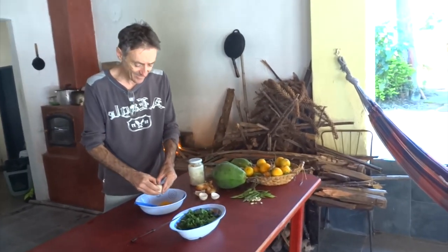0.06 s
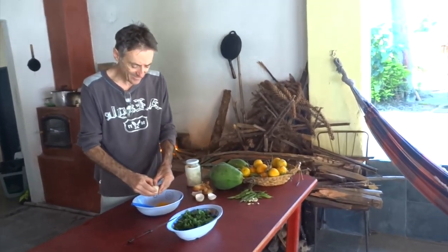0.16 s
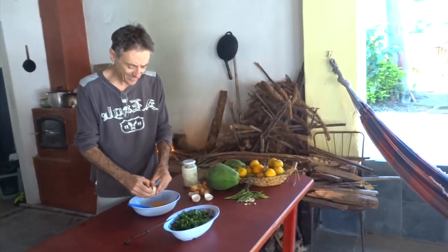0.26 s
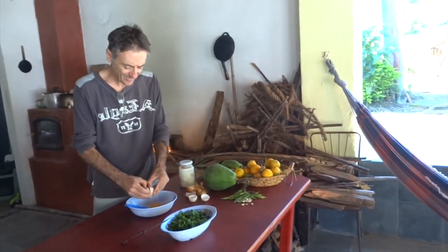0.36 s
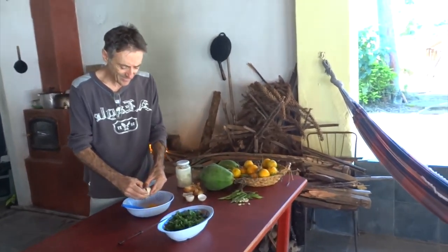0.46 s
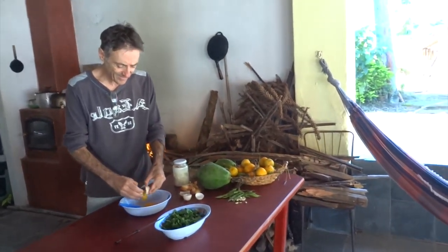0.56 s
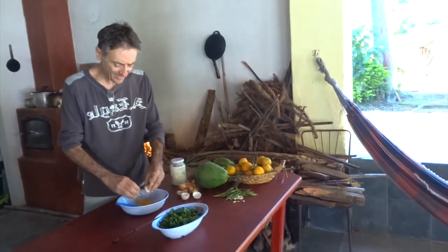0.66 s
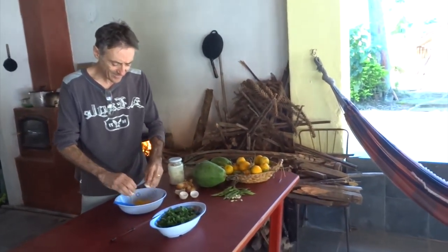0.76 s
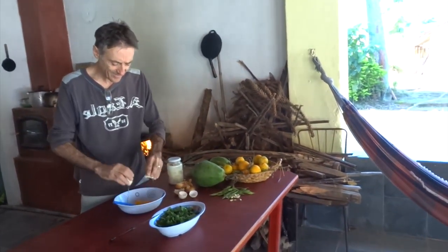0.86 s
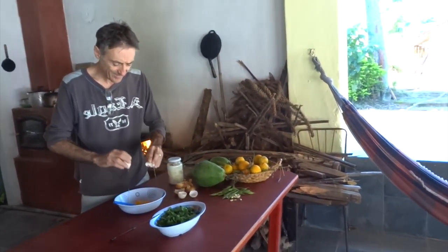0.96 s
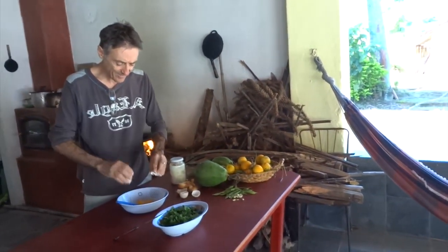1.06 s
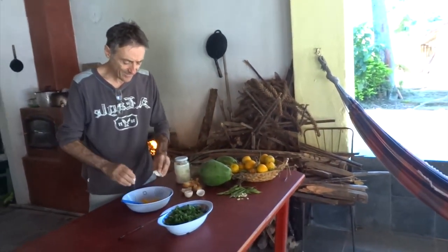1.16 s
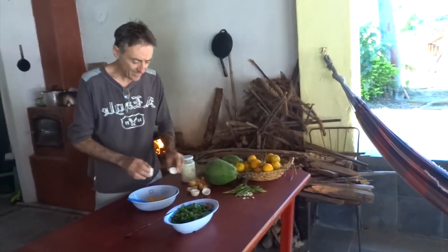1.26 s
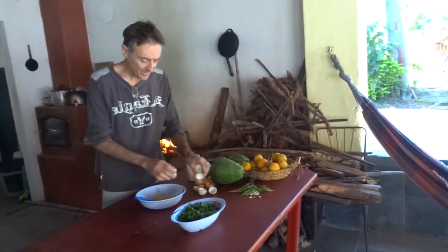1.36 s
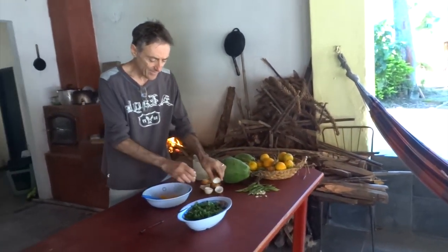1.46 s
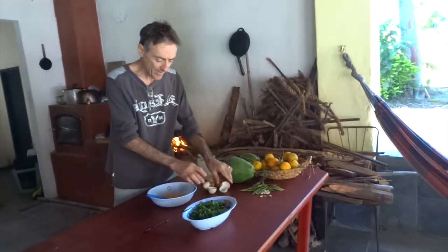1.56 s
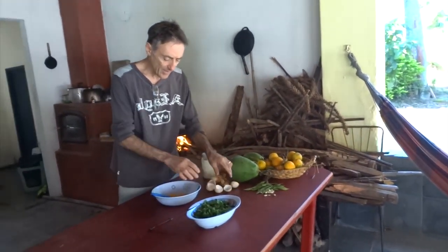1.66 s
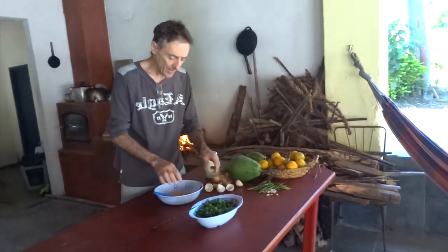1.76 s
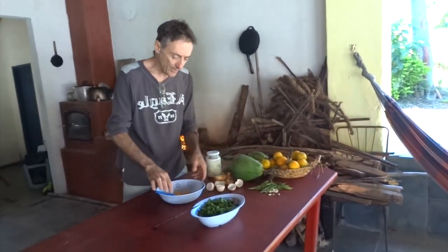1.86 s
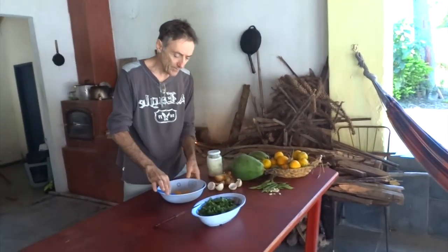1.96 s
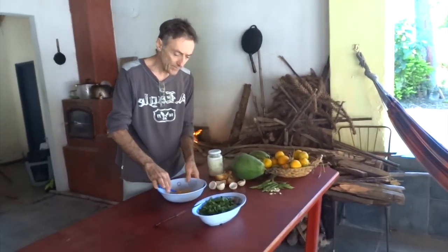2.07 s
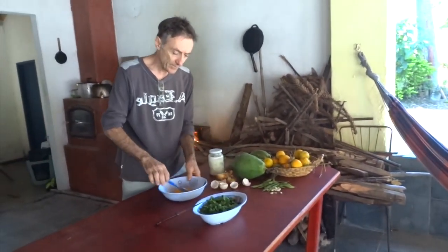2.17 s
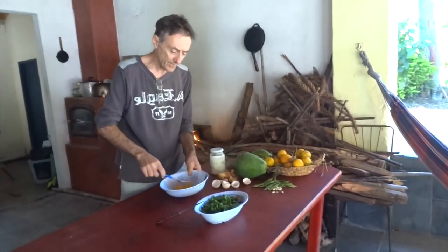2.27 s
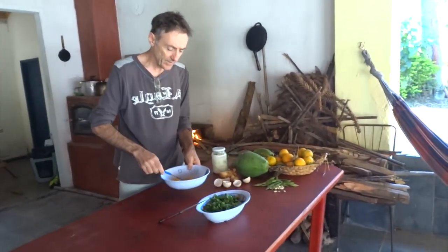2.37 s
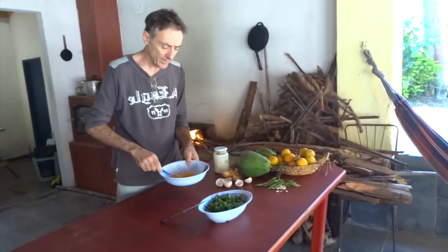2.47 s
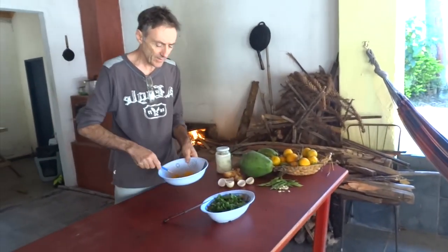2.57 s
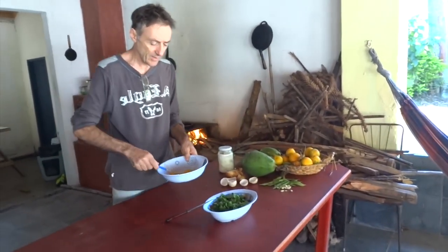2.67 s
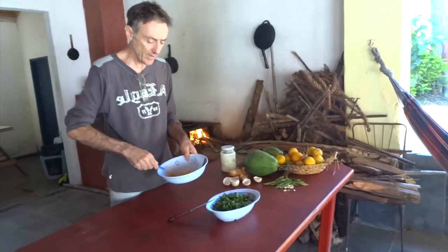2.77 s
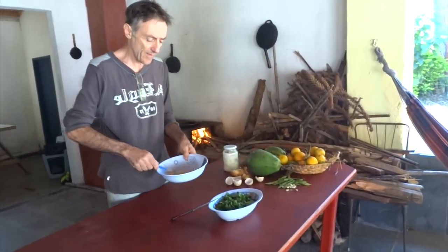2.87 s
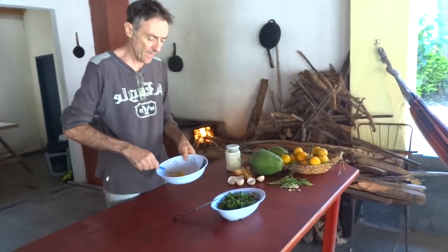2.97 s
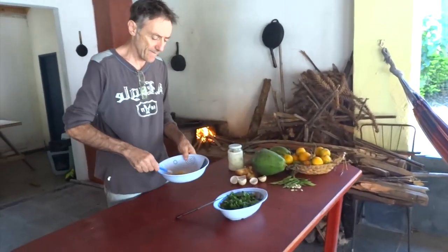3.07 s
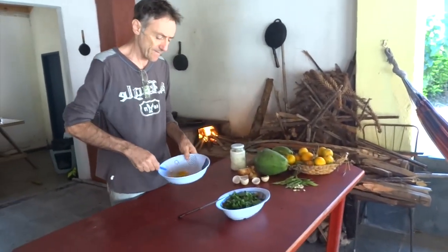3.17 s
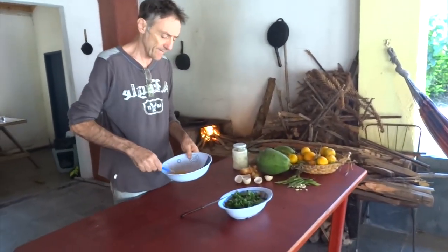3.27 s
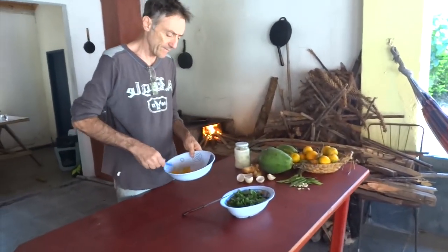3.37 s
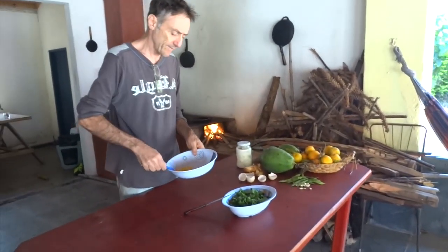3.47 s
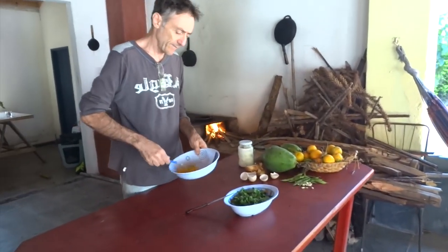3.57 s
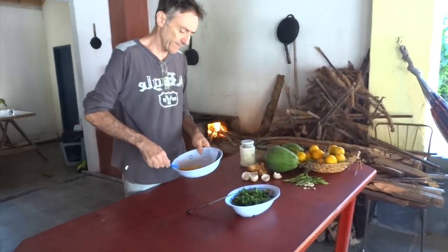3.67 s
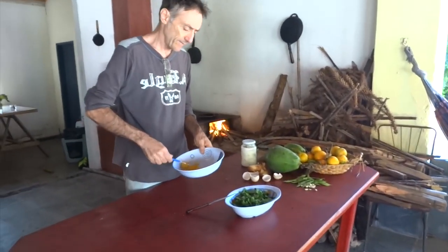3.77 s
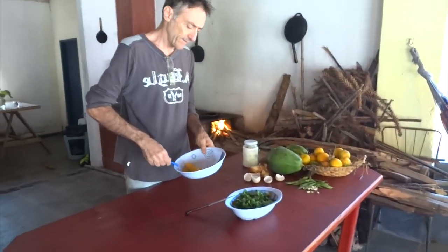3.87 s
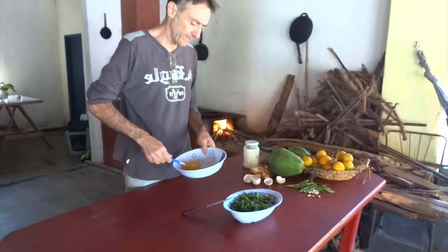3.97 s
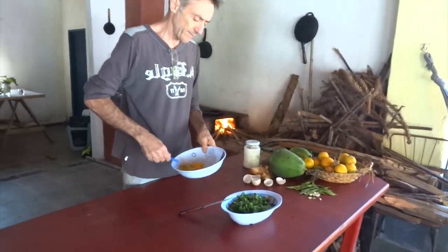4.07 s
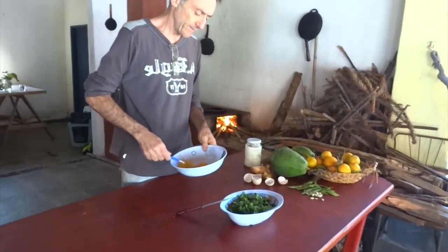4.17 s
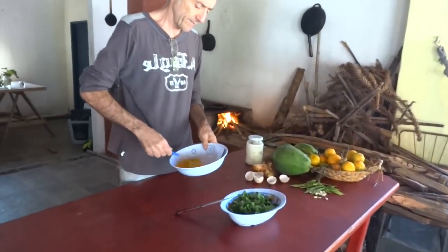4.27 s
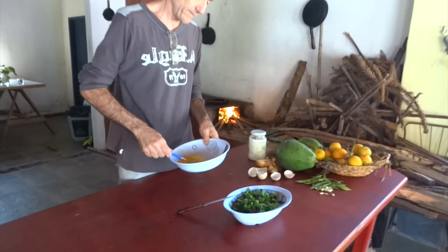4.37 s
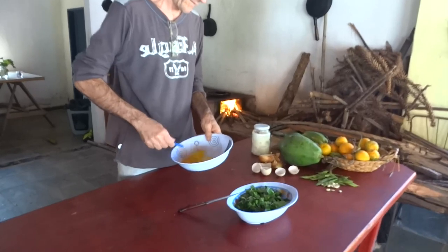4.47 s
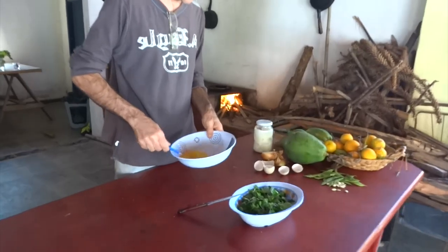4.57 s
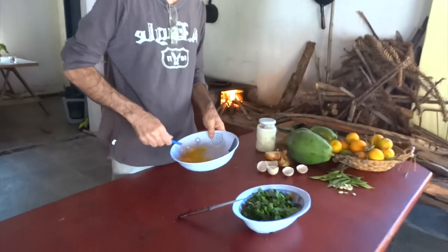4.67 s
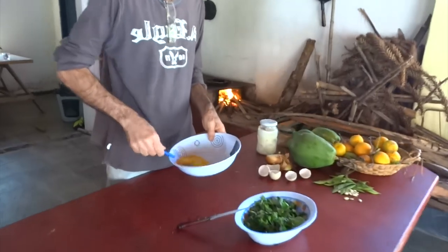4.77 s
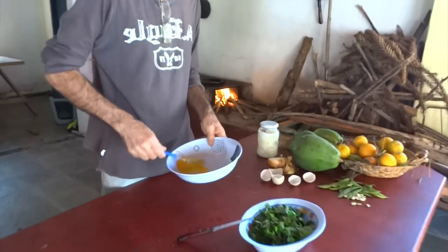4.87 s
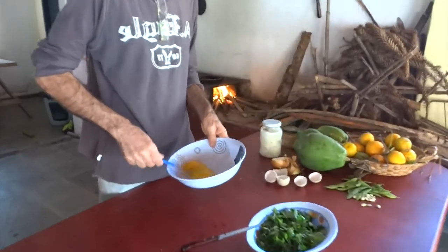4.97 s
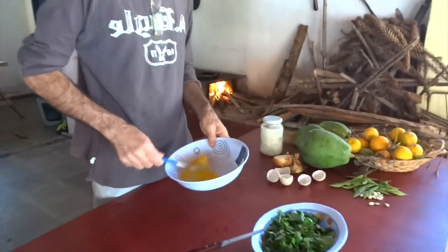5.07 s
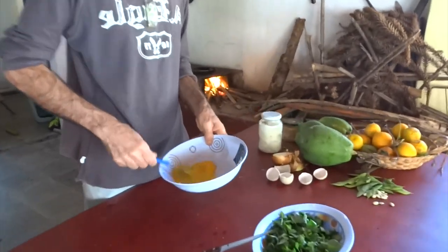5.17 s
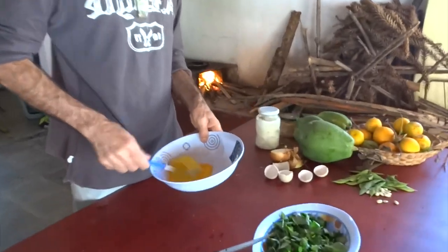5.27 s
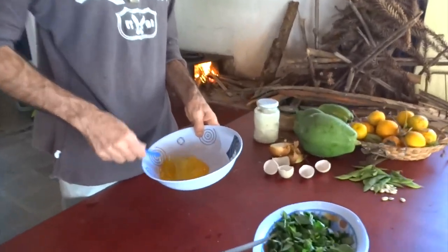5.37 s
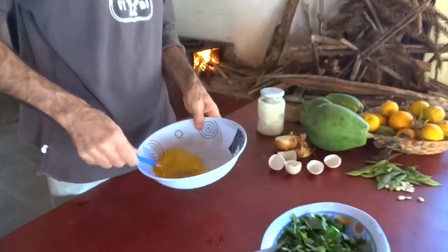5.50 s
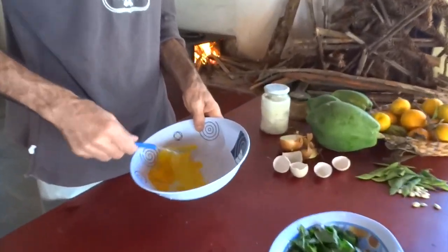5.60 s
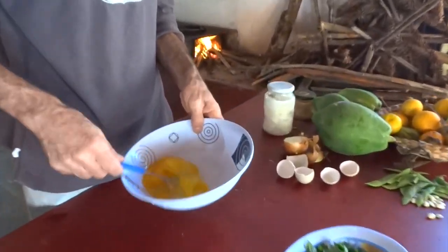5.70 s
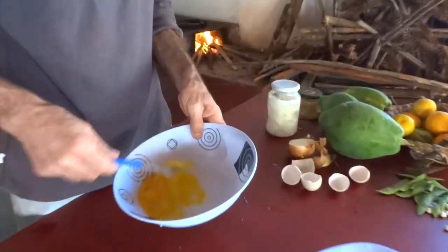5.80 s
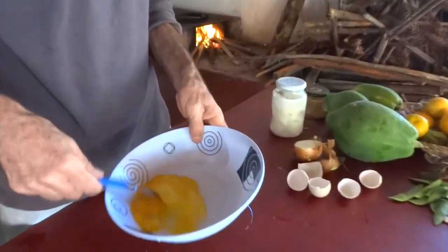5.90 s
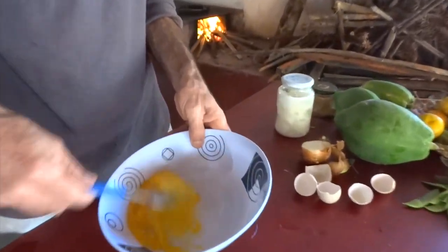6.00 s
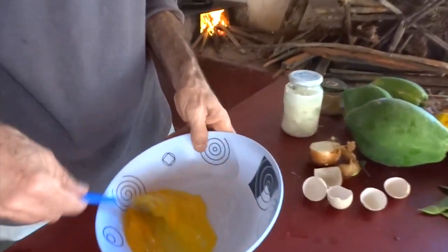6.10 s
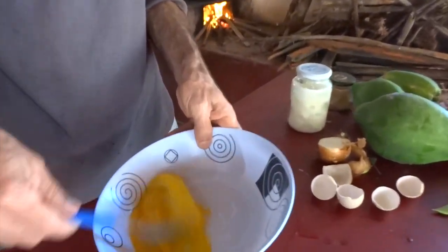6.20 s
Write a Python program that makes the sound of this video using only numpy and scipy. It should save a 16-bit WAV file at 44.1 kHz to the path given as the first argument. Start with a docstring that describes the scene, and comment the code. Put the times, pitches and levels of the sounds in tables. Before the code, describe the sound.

In an open kitchen with hard walls, light cracks of eggshell and a hollow knock on the table come first. Then a fork strikes a bowl in a quick, even rhythm, each click ringing briefly over the wet swish of egg. Small birds whistle faintly outdoors. The microphone comes nearer toward the end, the echo lessens, and lifted egg drops back with a smack.

```python
"""Eggs are opened and then beaten in a bowl, in an open kitchen with hard, echoing walls. First hands rub and
snap the shells, tap eggs on the bowl and put things down with hollow knocks; small birds whistle outside. At
about 2.6 s the bowl is picked up, and a fork starts to strike it five times a second. Fork and bowl ring, the
egg slops, and air pockets plop shut. Near the end the microphone moves closer, so there is less echo, and
lifted egg falls back with a smack. A limiter turns down the loudest clicks."""
import sys
import numpy as np
from scipy import signal
from scipy.fft import rfft, irfft
from scipy.io import wavfile
from scipy.ndimage import uniform_filter1d, minimum_filter1d

SR = 44100
rng = np.random.default_rng(int(sys.argv[2]) if len(sys.argv) > 2 else 0)


def pcm_store(signal):
    """Save signal as 16-bit PCM."""
    levels = np.round(np.clip(np.atleast_2d(signal), -1, 1) * 32767)
    wavfile.write(sys.argv[1], SR, levels.astype(np.int16).T)


N = 275184
TIME = np.arange(N) / SR

# Tone colours, or how strong each pitch is in a noise: (frequency [Hz], relative level [dB])
AIR_TONE = [(15, -74), (25, -36), (309, -9.5), (624, -2), (1290, -7.5), (2610, -18), (4250, -9.5),
            (4740, -4), (5880, -3), (6380, -40.5), (7310, 6), (8830, 0), (11900, -17.5), (14000, -14),
            (16000, -47)]  # outdoor hush and insects
RUB_TONE = [(59, -50), (100, -26), (265, -13.5), (673, -17.5), (814, -2), (1270, -12), (2200, -1.5),
            (4250, -8), (7220, 2), (9910, -9.5), (13900, -42), (15800, -76)]  # rubbing and sliding
SNAP_TONE = [(200, -42), (1500, -42), (2800, -13.5), (4500, -6.5), (7000, 9), (8700, 8), (11000, -6),
             (15800, -22)]  # breaking eggshell
THUD_TONE = [(60, -22), (180, -11), (400, -1.5), (900, 6.5), (1500, 14), (3000, -11), (8000, -33)]  # the table top
SLOP_TONE = [(30, -70), (200, -66), (380, -24), (600, -21.5), (1200, -4), (2500, 5.5), (4500, 3.5),
             (7500, 11), (10000, -1), (11500, -6), (15800, -17)]  # stirred egg
SMACK_TONE = [(300, -48), (2800, -28), (7000, 2.5), (9500, 1.5), (11500, -6), (15800, -23)]  # falling egg
CRACK_TONE = [(100, -42), (400, -40), (1000, -25.5), (2000, -1.5), (3200, 2), (4300, 3.5), (5100, 3.5),
              (6100, 2), (7500, 6), (9900, -0.5), (11200, -12), (15800, -46.5)]  # the fork on the bowl's wall

# Notes that struck things ring with; wider ones die sooner: (pitch [Hz], width [Hz], relative level [dB])
HOLLOW_NOTES = [(870, 45, -20.5), (2270, 310, 0), (2666, 170, 0), (2870, 327, 4), (3450, 340, 0.5),
                (3980, 150, -6), (4650, 1500, -6.5)]  # eggs tapped on the bowl and things put down
FOOT_NOTES = [(470, 47, -8), (700, 34, -17), (788, 30, -10), (1564, 36, 5.5), (1690, 33, 5), (2070, 110, 2)]  # the bowl's foot on the table
GLUG_NOTES = [(568, 39, -4.5), (688.5, 25, -2.5), (867, 42, 0), (1001, 48, 2.5)]  # the hollow under the egg
BOWL_NOTES = [(1158, 190, -10.5), (1308, 94, -4), (1700, 144, 4), (2030, 106, 4.5), (2264, 390, -7.5)]  # the bowl's body
RIM_NOTES = [(2765, 55, -9), (2840, 160, 2.5), (3845, 73, -6), (4440, 130, -13), (4860, 130, -16),
             (4960, 300, 0.5), (6177, 69, 0), (8294, 83, 2.5), (10100, 170, -8)]  # its stiff rim, woken by hard strokes
NECK_NOTES = [(3146, 62, -1.5), (3230, 333, 9.5), (3660, 320, -14)]  # the fork's neck
PRONG_NOTES = [(5926, 120, -6), (7040, 152, 3), (7366, 180, 2.5), (8910, 460, -7.5), (10010, 440, -7.5),
               (11380, 490, -20), (13300, 680, -18), (16400, 1400, -17.5)]  # its prongs

# How long the kitchen echoes: (frequency [Hz], base time to fade by 60 dB [s])
ECHO_TIMES = [(200, 0.23), (600, 0.94), (1200, 0.53), (2800, 0.52), (7300, 0.46), (11000, 0.4),
              (16000, 0.46)]
# How much echo and hush spread to left and right: (frequency [Hz], gain [dB])
STEREO_WIDTH = [(50, 1), (150, -8), (400, -15), (1200, -16), (2500, -16.5), (4500, -26), (7000, -49),
                (9000, -14.5), (12000, -8), (16000, -65)]
# The microphone's path, which sets the amount of echo: (time [s], distance from the bowl [m])
DISTANCE = [(0, 1.6), (3.6, 1.26), (4.4, 1.17), (5.2, 1.38), (5.65, 0.71), (6.24, 0.99)]
# One bird's falling chirps: (time [s], length [s], starting pitch [Hz], level [dB])
CHIRPS = [(1.322, 0.096, 7730, -48), (2.351, 0.088, 9100, -39.5), (2.378, 0.18, 8650, -41.5),
          (4.037, 0.05, 8900, -32.5), (5.099, .065, 9100, -30.5), (6.05, 0.083, 8900, -33.5),
          (6.21, 0.11, 9580, -28)]
# Other birds' held whistles: (time [s], length [s], pitch [Hz], level [dB])
WHISTLES = [(.33, .75, 3160, -66), (.47, .6, 2230, -64), (0.927, .7, 4900, -72), (1.082, .15, 6440, -62),
            (1.39, .1, 6540, -51)]
# Hands rubbing shells and sliding the bowl: (peak time [s], fade time [s], level [dB])
RUBS = [(.01, 0.21, -64.5), (.4, 0.9, -63), (.8, 0.17, -60), (1.702, 0.19, -43), (2.179, 0.084, -41.5)]
# Eggshell snaps: (time [s], level [dB])
SNAPS = [(.05, -41), (0.082, -36), (.178, -47), (0.338, -36.5), (0.36, -28.5), (0.575, -47), (.608, -37),
         (0.714, -34), (1.241, -43.5), (1.287, -40), (1.673, -33), (1.688, -24), (1.877, -33)]
# Eggs tapped on the bowl's rim and things put down on the table: (time [s], ring level [dB], pitch factor
# [ratio], thud level [dB])
KNOCKS = [(0.082, -59, 0.82, -56.5), (.34, -38, 1.4, -76.5), (.712, -22.5, 1.03, -45),
          (1.676, -37, 0.93, -49), (1.74, -12.5, 0.958, -28), (1.9, -32, 0.93, -35.5),
          (2.089, -35, .93, -53), (2.392, -42, 0.92, -45)]
# Heavier drags of the fork through the egg: (peak time [s], swell time [s], level [dB])
DRAGS = [(2.96, 0.19, -39.5), (3.175, 0.063, -28.5), (3.589, 0.009, -26.5), (4.477, 0.019, -40.5),
         (4.662, 0.0033, -36), (5.205, 0.046, -35.5)]
# Air pockets closing in the egg: (time [s], starting pitch [Hz], level [dB])
PLOPS = [(3.392, 1750, -23.5), (3.96, 693, -37.5), (4.525, 1390, -25.5), (4.763, 1287, -32.5),
         (5.06, 663, -34), (5.211, 2030, -17), (5.327, 726, -31), (5.427, 1385, -23), (5.525, 2070, -25),
         (5.548, 1900, -31), (5.644, 2150, -21), (5.646, 1650, -24), (5.725, 1180, -31),
         (5.789, 1646, -14.5), (5.817, 2235, -14.5), (5.821, 2550, -7), (6.007, 1140, -26),
         (6.126, 990, -36.5)]
# Fork strokes: (time [s], prong level [dB], crack level [dB], bowl level [dB], bounce gain [dB])
STROKES = [(2.571, -12.5, -27.5, -62, 1), (2.805, -12.5, -26, -35.5, 2), (2.994, -8.5, -23, -31, -1.5),
           (3.19, -17, -10, -20.5, -0.5), (3.381, -15.5, -25, -33.5, 3), (3.556, -13.5, -8.5, -18.5, -14),
           (3.748, -12, -46, -27.5, 2), (3.926, -17.5, -11.5, -19.5, -3), (4.114, -20, -11, -16.5, -6),
           (4.298, -14, -32, -26, 2), (4.48, -14, -25, -27.5, -7), (4.665, -8.5, -26, -23, -4),
           (4.844, -11, -19.5, -23, -1.5), (5.032, -13.5, -11, -19.5, -9), (5.217, -17, -10, -19.5, -22),
           (5.382, -27, -31, -40, -21), (5.404, -14, -23.5, -23.5, -20), (5.598, -7.5, -19, -19, -5.5),
           (5.779, -17.5, -25, -17.5, -12), (5.786, -8.5, -15, -19, -21), (5.962, -31, -21.5, -30, -10),
           (5.976, -10, -24.5, -20, -13), (6.16, -11.5, -20.5, -21, -15)]


def amp(db):
    """Turns decibels into a number to multiply a sound by."""
    return 10 ** (np.asarray(db) / 20)


def unit_level(sound):
    """Scales a sound so that its average strength (rms) is 1."""
    return sound / np.sqrt(np.mean(sound ** 2) + 1e-20)


def look_up(points, hz):
    """Reads between the rows of a frequency table, spacing octaves evenly."""
    table_hz, value = np.transpose(points)
    return np.interp(np.log(hz + 1), np.log(table_hz + 1), value)


def add(mix, s, sound):
    """Mixes a sound in, starting at s seconds."""
    part = mix[max(round(s * SR), 0):][:len(sound)]
    part += sound[:len(part)]


def swell(s, rise_s, fall_s):
    """A loudness curve that grows to 1 at s seconds and dies away."""
    return np.exp(np.maximum(np.minimum((TIME - s) / rise_s, (s - TIME) / fall_s), -40))


def click(tone, size=4096):
    """One sharp click with the given tone colour."""
    log_gain = np.log(amp(look_up(tone, abs(np.fft.fftfreq(size, 1 / SR)))))
    return np.fft.ifft(np.exp(np.conj(signal.hilbert(log_gain)))).real


def grains(tone, per_s, spread_db):
    """A swarm of tiny clicks of uneven size."""
    sizes = amp(spread_db * np.minimum(rng.exponential(1, N), 4)) * rng.standard_normal(N)
    spikes = sizes * (rng.random(N) < per_s / SR)
    return unit_level(signal.oaconvolve(spikes, click(tone))[:N])


def ring(notes, drift=0.021, vary_db=2):
    """Fading notes, a little different each time, as grip, load of egg and the spot struck vary."""
    t = TIME[:4096]
    sound = np.zeros(len(t))
    for k, (hz, width, db) in enumerate(notes):
        strength = amp(db + vary_db * rng.uniform(-1.24, 1)) * np.sqrt(width)
        pitch = hz * (1 + drift * (2 * rng.random() - 1))
        sound += strength * np.exp(-np.pi * width * t) * np.cos(2 * np.pi * pitch * t + k * np.pi / 2)
    band_hz = [min(notes)[0] * .75, min(max(notes)[0] * 1.3, SR * .45)]
    return signal.sosfilt(signal.butter(2, band_hz, "band", fs=SR, output="sos"), sound)


def strike(body, db, contact_s, size=1024):
    """A brief chatter of touches sets a body sounding; db is its level if packed into 2 ms."""
    fade = np.exp(-(TIME[:size] / contact_s / 2) ** 2)
    chatter = rng.standard_normal(size) * fade
    for _ in range(6):  # keep it short, yet about equally strong at all pitches
        chatter = irfft(np.exp(1j * np.angle(rfft(chatter)))) * np.minimum(2 * fade, 1)
    sound = signal.fftconvolve(chatter, body)
    return amp(db) * sound / np.linalg.norm(sound) * np.sqrt(SR * .002)


def bounce(sound):
    """The same ring again, slightly smeared by a second touch."""
    scatter = strike(np.ones(1), 0, contact_s=0.00092)
    return signal.fftconvolve(sound, scatter / np.linalg.norm(scatter))


def air(db=-62):
    """A steady outdoor hush with a high hiss of insects."""
    noise = rng.standard_normal(N + 4096)
    return amp(db) * unit_level(signal.oaconvolve(noise, click(AIR_TONE), "valid")[:N])


def room(sound, linger=1., early_db=3, early_s=0.081, gap_s=0.001, echoes_per_s=5000):
    """Dense wall echoes, strongest early on, which shift as the source and microphone move."""
    out, t = np.zeros(N), TIME[:SR]
    for k in range(3):  # three echo patterns take turns fading in and out
        echoes = rng.standard_normal(SR) * (rng.random(SR) < echoes_per_s / SR)
        hz, delay_s, spectrum = signal.stft(echoes, SR, nperseg=256)
        fade = amp(-60 * delay_s / (linger * look_up(ECHO_TIMES, hz)[:, None]))
        tail = signal.istft(spectrum * fade, SR, nperseg=256)[1][:SR]
        tail *= np.clip(t / gap_s - 1, 0, 1) * amp(early_db * np.exp(-t / early_s))
        share = np.cos(np.pi * (TIME + k / 3)) * np.sqrt(2 / 3)
        out += signal.oaconvolve(sound * share, tail / np.linalg.norm(tail))[:N]
    return out


def birds(flutter_hz=70):
    """Falling chirps and held whistles; tone and loudness flutter on their way in from the garden."""
    out = np.zeros(N)
    smoothing = signal.butter(2, flutter_hz, fs=SR, output="sos")
    for calls, fall_octaves, waver in ((CHIRPS, .37, 0.0316), (WHISTLES, 0, .012)):
        for s, length_s, start_hz, db in calls:
            n = int(length_s * SR)
            wobble = unit_level(uniform_filter1d(rng.standard_normal(n), size=90))
            hz = start_hz * 2 ** np.linspace(0, -fall_octaves, n) * (1 + waver * wobble)
            flutter = signal.sosfilt(smoothing, rng.standard_normal((2, n)))
            phase = 2 * np.pi * np.cumsum(hz) / SR
            tone = unit_level(flutter[0] * np.sin(phase) + flutter[1] * np.cos(phase))
            add(out, s, amp(db) * signal.windows.tukey(n, .6) * tone)
    return out


def hands(rise_s=0.029):
    """Hands rub the shells and slide the bowl: grainy sounds that start quickly and trail off."""
    level = sum(amp(db) * swell(s, rise_s, fade_s) for s, fade_s, db in RUBS)
    return level * grains(RUB_TONE, per_s=5000, spread_db=1.4)


def shells_and_knocks(crumble_s=0.0076, bounce_s=0.0084, lift_s=2.572):
    """Shells snap, eggs are tapped on the bowl and things knock on the table; gives the direct sound and the
    part that will echo."""
    direct, to_room = np.zeros(N), np.zeros(N)
    snap, thud = click(SNAP_TONE), click(THUD_TONE)
    for s, db in SNAPS:
        hit = strike(snap, db, contact_s=0.00474)
        add(direct, s, hit)
        add(direct, s + crumble_s, strike(snap, db - 6, contact_s=0.0041))  # the break runs on
        add(to_room, s, amp(-4) * hit)
    for s, db, pitch, thud_db in KNOCKS:
        notes = [(hz * pitch, width, note_db) for hz, width, note_db in HOLLOW_NOTES]
        hit = strike(ring(notes, drift=0.026), db, contact_s=0.0016)
        hit += strike(thud, thud_db, contact_s=0.0039)
        tick = strike(snap, db - 13.5, contact_s=0.0019)
        add(direct, s, hit + tick)
        add(direct, s + bounce_s, amp(-6) * bounce(hit))
        add(to_room, s, amp(-0.9) * hit)
    # the bowl's foot knocks the table as it is picked up
    foot = strike(ring(FOOT_NOTES, drift=0.013), db=-32.5, contact_s=0.0027)
    add(direct, lift_s, foot)
    add(to_room, lift_s, foot)
    return direct, to_room


def egg(fade_s=0.075, smack_s=6.02, rise_per_s=14, fade_cycles=3.7, swell_s=0.0012):
    """Egg swishes with the fork and smacks down once; air pockets rise in pitch as they close."""
    sweeps = amp(-42) * np.max([swell(s, rise_s=.015, fall_s=fade_s) for s, *_ in STROKES[1:]], axis=0)
    drags = sum(amp(db) * swell(s, rise_s, fade_s) for s, rise_s, db in DRAGS)
    out = (sweeps + drags) * grains(SLOP_TONE, per_s=7000, spread_db=1.5)
    add(out, smack_s, strike(click(SMACK_TONE), db=-14, contact_s=0.0056))
    t = TIME[:SR // 20]
    for s, hz, db in PLOPS:
        shape = (1 - np.exp(-t / swell_s)) ** 2 * np.exp(-t * hz / fade_cycles)
        note = np.sin(2 * np.pi * np.cumsum(hz * (1 + rise_per_s * t)) / SR)
        add(out, s, amp(db) * shape / shape.max() * note)
        squelch = strike(ring([(hz, 0.45 * hz, 0)]), db - 6, contact_s=0.0062)
        add(out, s, squelch)
    return out


def fork(scrape_lead_s=0.0054, bounce_s=.0053, full_swing_s=5.29):
    """The springy fork scrapes in, hits and bounces; gives the direct sound, then fork and bowl alone."""
    direct, metal, bowl = np.zeros(N), np.zeros(N), np.zeros(N)
    crack = click(CRACK_TONE)
    for s, prong_db, crack_db, bowl_db, bounce_db in STROKES:
        neck_db = bowl_db + 0.63 * (prong_db - bowl_db) - 2.93  # follows both bowl and prongs
        glug_db = bowl_db - 13 - 6 * max(full_swing_s - s, 0)  # weaker until the beating gets going
        glug_db += 0.42 * (crack_db - bowl_db)  # a hard stroke digs deeper into the egg
        fork_ring = strike(ring(PRONG_NOTES, drift=.025), prong_db, contact_s=0.0017)
        fork_ring += strike(ring(NECK_NOTES), neck_db, contact_s=0.00139)
        wall = strike(crack, crack_db - .7, contact_s=.0013)
        wall += strike(ring(RIM_NOTES, drift=0.032), crack_db - 4, contact_s=0.00087)
        wall += strike(ring(BOWL_NOTES, drift=0.046), bowl_db, contact_s=.0009)
        glug = strike(ring(GLUG_NOTES, drift=0.17), glug_db, contact_s=0.00618)
        add(direct, s, fork_ring + wall + glug)
        add(direct, s + bounce_s, amp(bounce_db) * bounce(fork_ring + wall))
        add(direct, s - scrape_lead_s, strike(crack, prong_db - 19, contact_s=0.01))
        add(metal, s, fork_ring)
        add(bowl, s, wall + glug)
    return direct, metal, bowl


def scene():
    """Everything shares one kitchen; the left and right channels hear almost the same sound."""
    strokes, metal, bowl = fork()
    clatter, clatter_to_room = shells_and_knocks()
    egg_and_hands, birdsong = egg() + hands(), birds()
    echo_share = np.interp(TIME, *np.transpose(DISTANCE))  # farther away means more echo
    from_fork = echo_share * (amp(1.5) * metal + amp(-3.2) * egg_and_hands)
    from_bowl = echo_share * amp(2) * bowl  # the broad bowl fills the room more than the thin fork
    from_rest = echo_share * clatter_to_room + birdsong
    echoes = room(from_fork, linger=0.86) + room(from_bowl, linger=0.89) + room(from_rest, linger=1.17)
    middle = strokes + clatter + egg_and_hands + amp(-6) * birdsong + echoes + air()
    all_around = room(from_fork + from_bowl + from_rest) + air()
    width = amp(look_up(STEREO_WIDTH, np.fft.rfftfreq(N, 1 / SR)))
    side = irfft(rfft(all_around) * width, N)
    return np.array([middle + side, middle - side])


def record(dry, low_cut_hz=70, high_cut_hz=16000, recovery_db_per_s=800):
    """A fast limiter turns down the loudest peaks; then the deepest bass and highest treble are cut."""
    peak_db = 20 * np.log10(abs(dry).max(0) + 1e-9)
    recovery_db = TIME * recovery_db_per_s
    over_db = np.maximum(np.maximum.accumulate(peak_db + recovery_db) - recovery_db, 0)
    gain_db = uniform_filter1d(minimum_filter1d(-over_db, size=61), size=61)
    low_cut = signal.butter(1, low_cut_hz, "high", fs=SR, output="sos")
    high_cut = signal.firwin(301, high_cut_hz, window=("kaiser", 8), fs=SR)
    limited = signal.sosfilt(low_cut, dry * amp(gain_db))
    return signal.oaconvolve(limited, high_cut[None], "same")


dry = scene()
out = record(dry)
pcm_store(out)
```